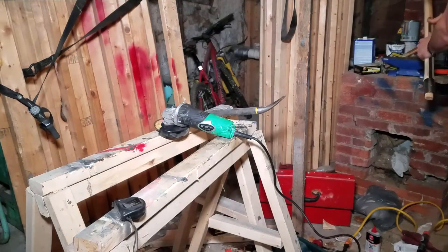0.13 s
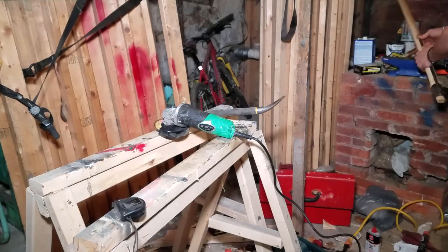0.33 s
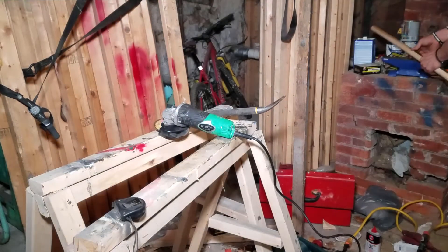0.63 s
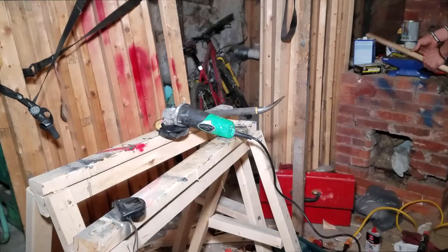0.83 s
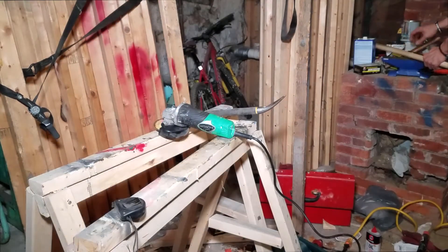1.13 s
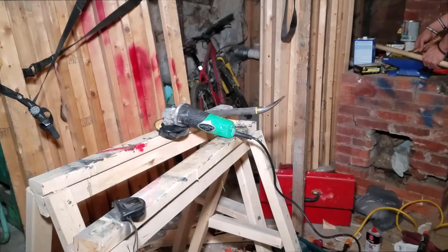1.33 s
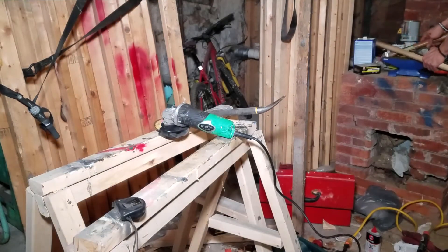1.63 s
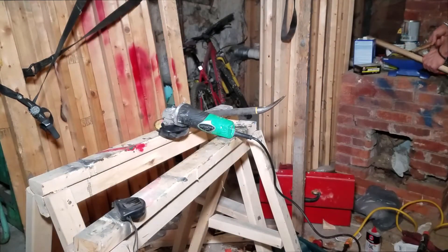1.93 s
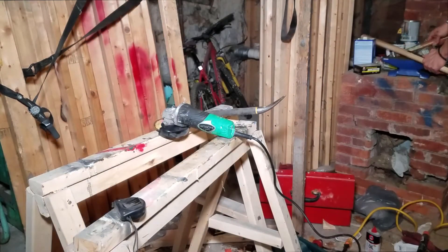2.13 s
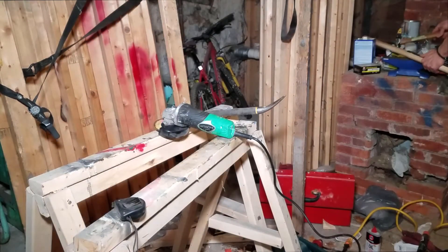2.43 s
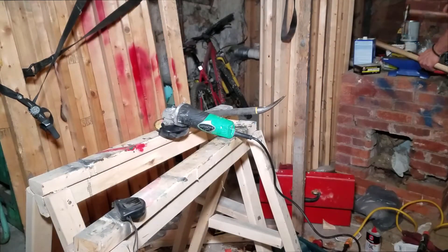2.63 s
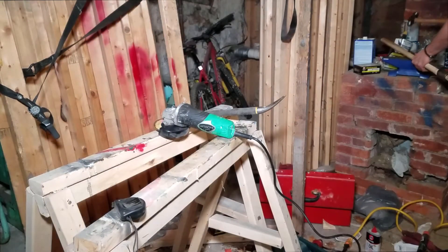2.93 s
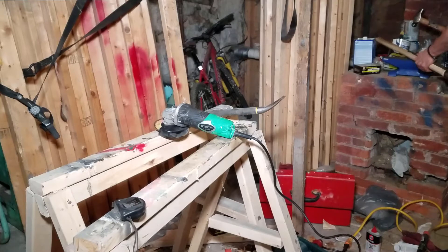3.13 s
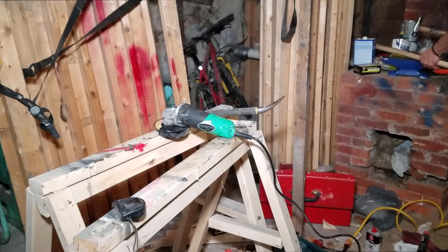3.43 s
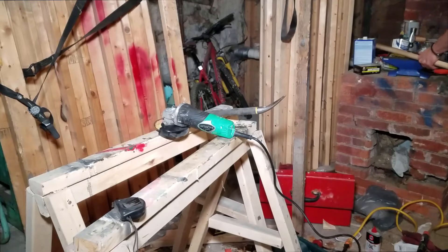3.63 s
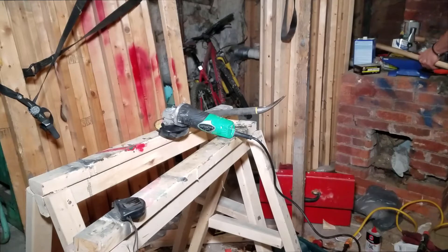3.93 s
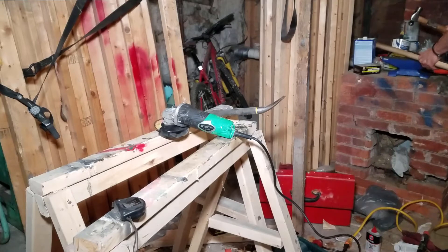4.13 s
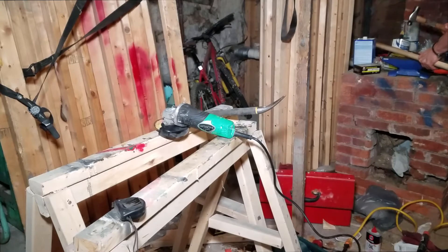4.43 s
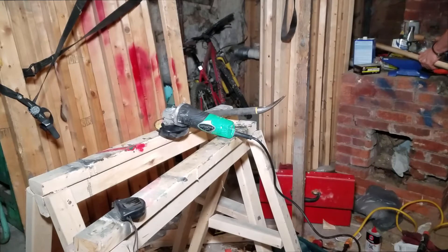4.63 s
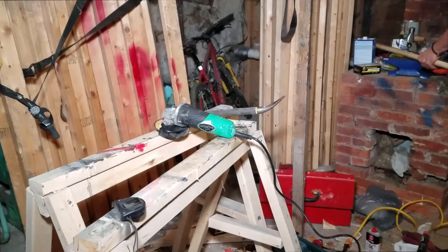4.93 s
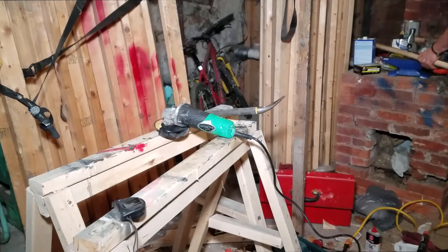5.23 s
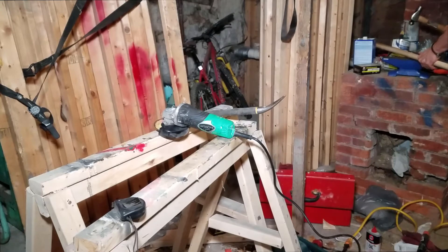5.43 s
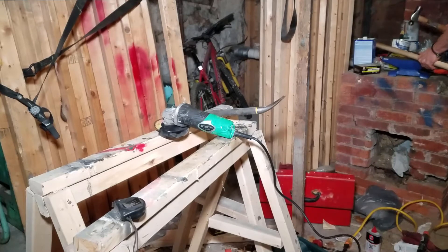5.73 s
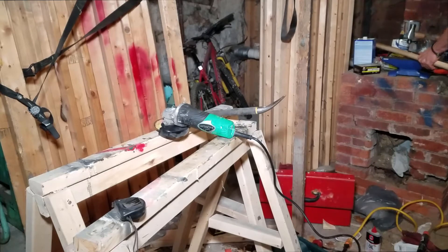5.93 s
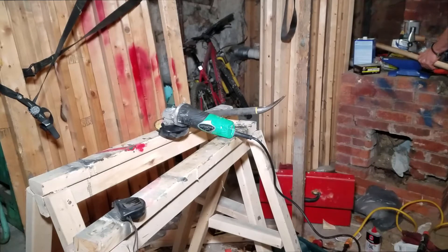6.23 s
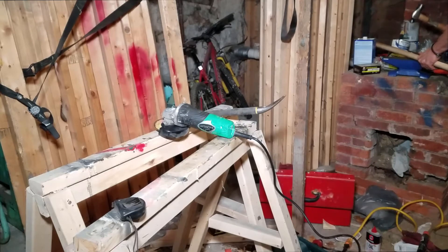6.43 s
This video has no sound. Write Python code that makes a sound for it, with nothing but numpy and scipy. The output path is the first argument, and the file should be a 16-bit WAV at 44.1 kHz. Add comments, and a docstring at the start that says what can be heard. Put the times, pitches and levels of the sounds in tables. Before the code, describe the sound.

Soft handling noise and scattered light knocks open the sound as a nail is set in a bench vice, with a few thin metallic pings. Then the hammer strikes nine times in a steady rhythm, loud and growing a little stronger. The blows have a short steel ring and a low wooden thud, echo briefly in the small workshop and push the microphone into slight distortion over faint room hiss.

```python
"""Nine hard, even hammer blows peen a nail in a bench vice in a brick basement. Each impact excites the
damped modes of the steel and a dense crash that fills the small room, shakes the wooden bench and
overloads the microphone. Before the blows, the hammer is turned in the hand with a rub of friction
noise, and the nail is set with a few light taps. A faint hiss lies under it all."""
import sys
import numpy as np
from scipy import signal
from scipy.fft import rfft, irfft, next_fast_len
from scipy.io import wavfile
from scipy.ndimage import map_coordinates

SR = 44100
rng = np.random.default_rng(int(sys.argv[2]) if len(sys.argv) > 2 else 0)


def pcm_store(signal):
    """Save signal as 16-bit PCM."""
    levels = np.round(np.clip(np.atleast_2d(signal), -1, 1) * 32767)
    wavfile.write(sys.argv[1], SR, levels.astype(np.int16).T)


N = 291060
LENGTH = 26460  # samples in one impact
TIME, AGE = np.arange(N) / SR, np.arange(LENGTH) / SR  # t/s in the scene and since an impact


def amp(db):
    """Amplitude ratio of a level in decibels."""
    return 10 ** (np.asarray(db) / 20)


def unit(x):
    """Normalisation to rms 1."""
    return x / np.sqrt(np.mean(x ** 2) + 1e-20)


def along(points, hz):
    """Interpolation of (f/Hz, value) points on a logarithmic frequency axis."""
    f, value = np.transpose(points)
    return np.interp(np.log(hz + 1), np.log(f + 1), value)


def filtered(x, response):
    """Zero-phase filtering: the spectrum of x times a gain that depends on frequency."""
    size = next_fast_len(len(x) + 8192)
    return irfft(rfft(x, size) * response(np.fft.rfftfreq(size, 1 / SR)), size)[:len(x)]


def noise(spectrum, size=LENGTH):
    """Gaussian noise of rms 1 with the spectral shape (f/Hz, level/dB)."""
    return unit(filtered(rng.standard_normal(size), lambda hz: amp(along(spectrum, hz))))


def resonant(spectrum, spacing_hz, depth_db):
    """Modal overlap: close resonances put random peaks and dips into a noise spectrum."""
    knots = rng.standard_normal(4000)
    def ripple(hz):
        return amp(depth_db * map_coordinates(knots, [hz / spacing_hz], mode="mirror"))
    return unit(filtered(noise(spectrum), ripple))


def fade(t, t60):
    """Exponential decay, 60 dB in t60."""
    return np.exp(-np.log(1000) * t / np.maximum(t60, 1e-3))


def rise(tau_s):
    """First-order onset with time constant tau_s."""
    return 1 - np.exp(-AGE / tau_s)


def swell(t, at, width):
    """Gaussian pulse with standard deviation width."""
    return np.exp(-.5 * ((t - at) / width) ** 2)


def ring(modes, blur):
    """Damped modes (f/Hz, level/dB, T60/s), weighted anew at each strike; reflections blur the phases."""
    hz, db, t60 = np.transpose(modes)[:, :, None]
    phase = np.cumsum(rng.standard_normal((len(hz), LENGTH)), 1) * blur / np.sqrt(SR)
    phase += rng.uniform(0, 2 * np.pi, hz.shape)
    gain = amp(db + rng.normal(0, 1.4, hz.shape))
    return np.sum(gain * fade(AGE, t60) * np.sin(2 * np.pi * hz * AGE + phase), 0)


def add(track, s, sound):
    """Superposition of a sound on the track from time s."""
    part = track[max(round(s * SR), 0):][:len(sound)]
    part += sound[:len(part)]


def basement_hiss():
    """Stationary broadband noise: the background of the room."""
    # noise spectrum: f/Hz, level/dB
    spectrum = [(15, -34.5), (25, -5), (33, -1.5), (130, -2.5), (216, -8.5), (749, -16), (834, -13.5),
                (1390, -20), (1550, -11), (2520, -25.5), (2810, -28.5), (3130, -10.5), (4210, -27.5),
                (6850, -33.5), (15800, -32.5)]
    return amp(-55) * noise(spectrum, N)


def walls(lift_db):
    """Early reflections from the brick, as a gain that holds the level up for a moment."""
    return amp(lift_db * swell(AGE, 0.015, 0.026))


def room_decay(x):
    """Reverberant decay: each frequency dies away at its own rate, the bass most slowly."""
    # reverberation time: f/Hz, T60/s
    room_t60 = [(60, 1), (160, 0.46), (420, 0.26), (1100, 0.26), (2900, 0.24), (7000, 0.25), (14000, 0.14)]
    hz, t, bands = signal.stft(x, SR, nperseg=512)
    return signal.istft(bands * fade(t, along(room_t60, hz)[:, None]), SR, nperseg=512)[1][:LENGTH]


def handling():
    """Friction noise: hand and sleeve rub on the hammer as it is turned and brought into place."""
    # hand movements: start t/s, duration/s, level/dB
    moves = [(0.08, 0.18, -45.5), (0.6, 0.57, -48), (1.26, 0.58, -46.5), (1.59, 0.41, -51.5),
             (2.043, 0.094, -40.5), (2.625, 0.1, -40.5), (2.787, 0.04, -36)]
    # friction spectra of hand and sleeve: f/Hz, level/dB
    hand = [(59, -19), (100, -6.5), (236, -4.5), (355, -11), (484, 1), (1200, -10), (1810, -2), (2150, -22),
            (3290, -18), (6000, -56), (7800, -64), (13200, -120)]
    sleeve = [(1500, 7), (3000, 11), (5000, 2.5), (9000, -20.5), (12000, -1.5), (15500, -12)]
    attack_s, motion = 0.066, np.zeros(N)
    for s, length, db in moves:
        onset = np.clip((TIME - s) / attack_s, 0, 1)
        motion += amp(db) * onset * fade(np.maximum(TIME - s - length, 0), t60=0.64)
    rub = noise(hand, N)
    rustle = unit(amp(5.7 * noise([(12, 6), (40, -16), (200, -70)], N)))  # small uneven bursts
    return motion * (rub + amp(-11) * rustle * noise(sleeve, N))


def slides():
    """Stick-slip friction: the hammer slides through the palm and along the vice."""
    # strokes: t/s, slide level/dB, swell width/s, squeal level/dB
    strokes = [(0.225, -43.5, 0.038, -70), (0.525, -35, 0.044, -42), (2.93, -50.5, 0.2, -47)]
    # spectra of the slide and of steel squealing on steel: f/Hz, level/dB
    slide_spectrum = [(88, -49), (150, -45), (378, -6), (425, -6.5), (459, 4), (495, -9), (2860, -9),
                      (8920, -36.5), (15000, -30)]
    squeal_spectrum = [(1100, -40), (1500, 0), (1780, -6), (1850, 14), (1930, -25), (2300, -35),
                       (3000, -70)]
    slide, squeal = noise(slide_spectrum, N), noise(squeal_spectrum, N)
    grip = amp(3.3 * noise([(60, -2), (200, 3), (600, -60)], N))  # the surfaces catch and slip
    return grip * sum((amp(db) * slide + amp(squeal_db) * squeal) * swell(TIME, s, width)
                      for s, db, width, squeal_db in strokes)


def ticks():
    """Brief contacts of steel on steel radiate bright, fast-decaying noise."""
    # contacts: t/s, level/dB, T60/s
    contacts = [(0.938, -31.5, 0.18), (1.197, -39.5, 0.036), (1.589, -40, 0.07), (1.665, -52, 0.05),
                (1.924, -58, 0.097), (2.125, -40, 0.1), (2.64, -55, 0.18), (3.077, -42.5, 0.15)]
    spectrum = [(1500, -35), (3300, 12), (5000, 1.5), (8500, -13.5), (12000, -0.5), (15500, 0)]
    out = np.zeros(N)
    for s, db, t60 in contacts:
        add(out, s, amp(db) * noise(spectrum) * fade(AGE, t60))
    return out


def nail_pings():
    """Free vibration of the nail after a touch of the hammer face."""
    # touches: t/s, level/dB
    touches = [(0.94, -41.5), (1.587, -47), (2.123, -43.5)]
    # modes of the nail: f/Hz, level/dB, T60/s
    modes = [(3870, -3, .3), (4230, -4, .25), (4690, -3, .25), (5480, 0, .3), (6720, -6, .22),
             (10300, -9, .25), (10890, -10, .25), (11450, -9, .25)]
    out = np.zeros(N)
    for s, db in touches:
        add(out, s, amp(db) * ring(modes, blur=6.9) * rise(0.0033))
    return out


def loose_part():
    """A shaken steel part buzzes in two narrow bands of resonances."""
    # shakes: t/s, level/dB
    shakes = [(1.85, -43.5), (1.923, -46), (2.123, -41), (2.82, -59)]
    # buzz spectrum: f/Hz, level/dB
    spectrum = [(5600, -45), (6150, -6), (6450, -6), (6900, -40), (11400, -35), (11900, 0), (12200, -1),
                (12700, -35)]
    out = np.zeros(N)
    for s, db in shakes:
        buzz = resonant(spectrum, spacing_hz=73, depth_db=-3.5)
        add(out, s, amp(db) * buzz * fade(AGE, t60=0.29) * rise(0.011))
    return out


def bench(rumble_db):
    """Damped vibration: the bench heaves, rebounds and trembles on while what lies on it rumbles."""
    start_hz, rest_hz, sag_s = 109.9, 77.2, 0.072  # the pitch sags as the bench settles
    heave_s, width_s, rebound_delay_s = 0.047, 0.024, 0.089
    hz = rest_hz + (start_hz - rest_hz) * np.exp(-AGE / sag_s)
    swing = np.sin(2 * np.pi * np.cumsum(hz) / SR)
    rumble = noise([(30, -21.5), (70, -3.5), (110, 2.5), (160, 1.5), (300, -37), (900, -120)])
    heaves = swell(AGE, heave_s, width_s) + amp(-5) * swell(AGE, heave_s + rebound_delay_s, width_s)
    tremble = amp(-6.5) * fade(AGE, t60=0.9)
    return (heaves + tremble) * rise(0.008) * (swing + amp(rumble_db) * rumble)


def light_taps():
    """Weak impacts set the nail: each excites a dull knock, a hollow tone and the bench."""
    # taps: t/s, level/dB, main f/Hz, relative bass level/dB, relative hollow tone level/dB
    taps = [(0.002, -27, 1280, -1.5, -22), (0.115, -33.5, 722, -1, -12), (0.755, -33.5, 538, 1.5, -3.5),
            (0.938, -26, 1697, 9.5, -10.5), (1.280, -22.5, 868, 2, -9), (1.556, -47.5, 980, -10, -20),
            (1.587, -14.5, 1000, -11, -14), (1.85, -21.5, 827, -2, -5), (1.924, -17.5, 814, -7, -5.5),
            (2.126, -15, 1226, -13, -22), (2.697, -19.5, 490.3, -19, 8), (2.82, -29, 656, -1.5, -7.5),
            (3.076, -38, 1930, -5, -8)]
    # the direct sound stands out of the room's decay for a few milliseconds
    envelope = (fade(AGE, t60=0.25) + amp(3) * fade(AGE, t60=0.0081)) * rise(0.0016)
    out = np.zeros(N)
    for s, db, hz, bass_db, hollow_db in taps:
        body = [(40, bass_db - 42), (200, bass_db), (hz * .7, -2), (hz, 0), (hz * 1.3, -2),
                (hz * 2, -10), (3400, -15), (4800, -30), (8500, -47), (15000, -53)]
        # two low modes and faint steel overtones
        modes = [(hz, 0, .18), (hz * 1.77, 1, .2), (3200, -20, .2), (4300, -26, .2)]
        hollow = amp(hollow_db) * ring(modes, blur=3.4) * rise(0.003)
        knock = resonant(sorted(body), spacing_hz=61.4, depth_db=3.5) * envelope
        thump = amp(bass_db - 20) * bench(rumble_db=-5.5)
        add(out, s, amp(db) * (walls(lift_db=1) * (knock + hollow) + thump))
    return out


def crash(excitation, force_db):
    """Contact time sets bandwidth: a stronger blow is shorter and fills the room with more treble."""
    shelf_db, corner_hz = 1.5 + 0.58 * force_db, 2500
    bright = filtered(excitation, lambda hz: amp(shelf_db * hz ** 2 / (hz ** 2 + corner_hz ** 2)))
    return room_decay(bright) * rise(0.001)


def steel_ring(force_db, clang_db, ring_db):
    """Modal excitation: the point of impact weights the modes, and force brings out the high ones."""
    # joint modes of hammer, vice and nail: f/Hz, level/dB, nominal T60/s
    modes = [(225, -9, 0.27), (277, -8, 0.22), (304, -13, 0.3), (381, -22, 0.7), (468, -11, 0.23),
             (518, -8, 0.21), (668, -10, 0.2), (727, -11, 0.22), (779, -8, 0.18), (1040, -10, 0.23),
             (1246, -8, 0.2), (1273, -9, 0.19), (1385, -6, 0.18), (1650, -6, 0.18), (1673, -5, 0.17),
             (1775, -3, 0.18), (1834, -6, 0.24), (1919, 0, 0.18), (1964, -8, 0.19), (2046, -9, 0.18),
             (2522, -12, 0.2), (2607, -10, 0.23), (2986, -3, 0.17), (3028, -5, 0.24), (3854, -27, 0.48),
             (4211, -20, 0.33), (4685, -30, 0.32), (5487, -31, 0.25), (6706, -37, 0.23), (10892, -35, 0.27)]
    high_db = 3 + 2.2 * force_db
    weights = [(230, -0.53), (1400, -0.49), (1750, -0.25), (1920, clang_db), (2600, -1.1),
               (2950, ring_db), (3100, ring_db), (3800, high_db), (4200, high_db + 0.2 * ring_db),
               (4700, high_db), (6700, high_db - 0.3 * ring_db), (11000, high_db - 2 - 0.25 * ring_db)]
    struck = [(hz, db + along(weights, hz), 0.96 * t60) for hz, db, t60 in modes]
    return ring(struck, blur=5.9) * rise(0.0021)


def nail_overtones():
    """Deformation shifts modes: the spreading nail's short overtones land anew with every blow."""
    mode_hz = np.geomspace(4000, 14500, 14) * rng.uniform(.95, 1.05, size=14)
    return ring([(hz, -7 * np.log2(hz / 4000), .15) for hz in mode_hz], blur=14)


def contact_crack(force_db):
    """The contact transient: a brief burst of bright noise that grows with the force."""
    spectrum = [(2000, -23.5), (4000, 1.5), (8000, -23.5), (13500, -6.5), (16000, -14)]
    return amp(-14.5 + 0.3 * force_db) * noise(spectrum) * fade(AGE, t60=0.07)


def hammer_blows(fresh=0.63):
    """Impulse response of steel, bench and room: the same spot and walls give partly the same crash."""
    # blows: t/s, force level/dB, 1.9 kHz clang level/dB, 3 kHz ring level/dB
    blows = [(3.8898, -4.5, 4, 1), (4.234, -3, -6.5, -4.5), (4.571, -3.5, -2.5, -4.5),
             (4.89, -1.5, 0.5, -6), (5.203, 0.5, -0.5, -12), (5.5194, 0.5, 0, -10.5), (5.85, 0.5, 2.5, 6.5),
             (6.1833, 1, 3.5, 7), (6.5055, 1.5, 0, -3.5)]
    # crash spectrum: f/Hz, level/dB
    spectrum = [(25, -30.5), (60, -9), (170, -4.5), (240, 0.5), (380, -5), (600, -0.5), (1050, -1),
                (1850, 2.5), (2250, -6), (3200, -2), (4000, -13.5), (8000, -33.5), (13500, -21),
                (16000, -27)]
    common = np.sqrt(1 - fresh ** 2) * resonant(spectrum, spacing_hz=42.8, depth_db=1.5)
    out = np.zeros(N)
    for s, force_db, clang_db, ring_db in blows:
        excitation = common + fresh * resonant(spectrum, spacing_hz=45.5, depth_db=0.5)
        body = amp(-3) * crash(excitation, force_db) + amp(-6) * steel_ring(force_db, clang_db, ring_db)
        treble = amp(-26.5) * nail_overtones() + contact_crack(force_db)
        thump = amp(-19 + 0.55 * force_db) * bench(rumble_db=-14.5)
        add(out, s, amp(force_db) * (walls(lift_db=2) * body + treble) + thump)
    return out


def scene():
    """Superposition of the hammer work and the basement's hiss in one channel."""
    impacts = hammer_blows() + light_taps() + ticks() + nail_pings() + loose_part()
    return (impacts + handling() + slides() + basement_hiss())[None]


def record(dry, cutoff_hz=15600):
    """Saturation and band limiting: the microphone flattens the loudest peaks and cuts the top treble."""
    saturated = dry[0] / (1 + np.abs(dry[0]) ** 10) ** (1 / 10)
    return filtered(saturated, lambda hz: 1 / np.sqrt(1 + (hz / cutoff_hz) ** 160))[None]


dry = scene()
out = record(dry)
pcm_store(out)
```